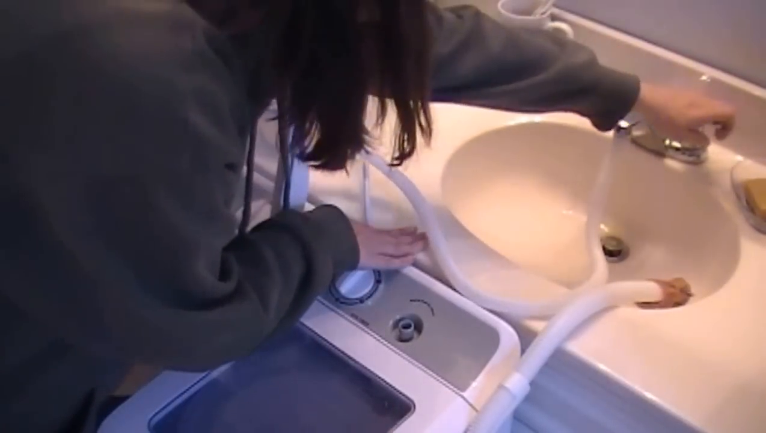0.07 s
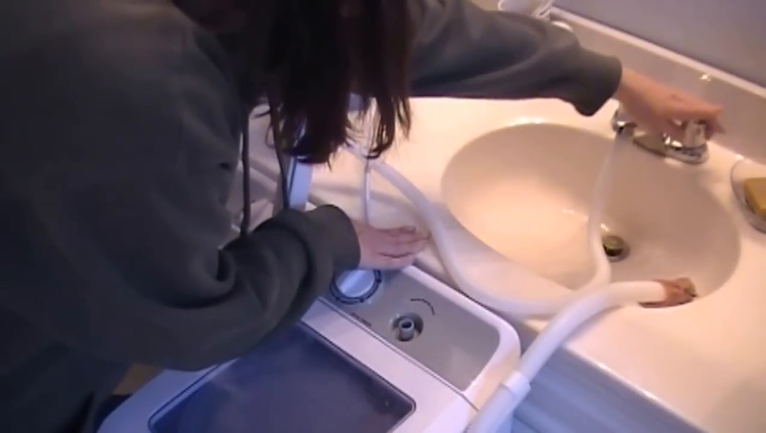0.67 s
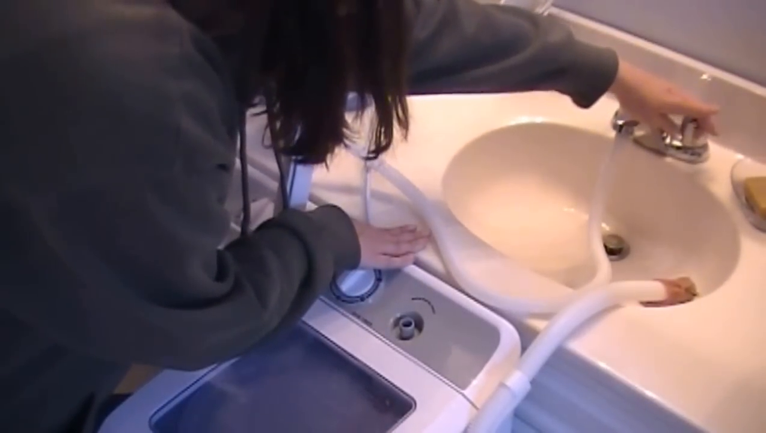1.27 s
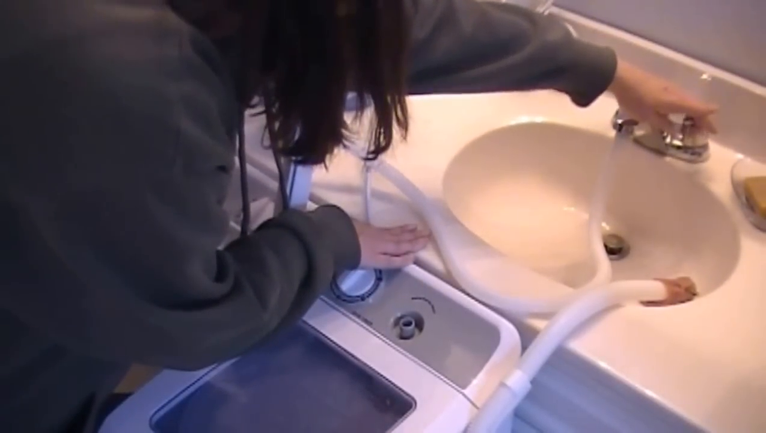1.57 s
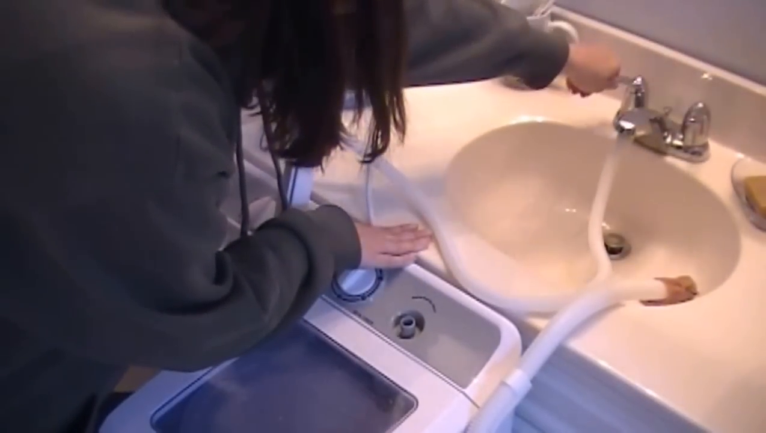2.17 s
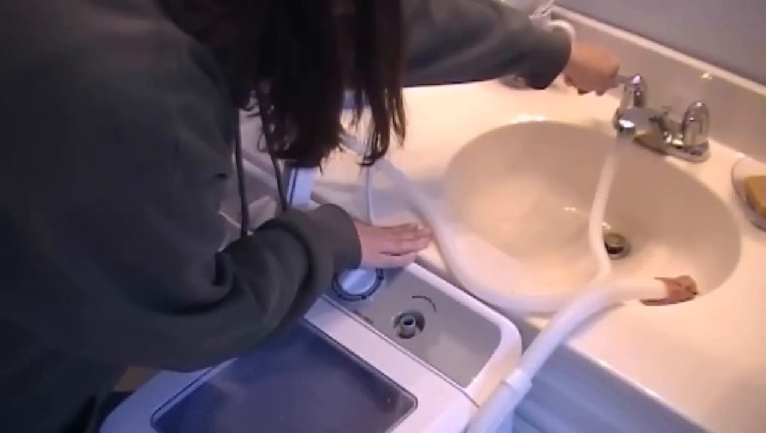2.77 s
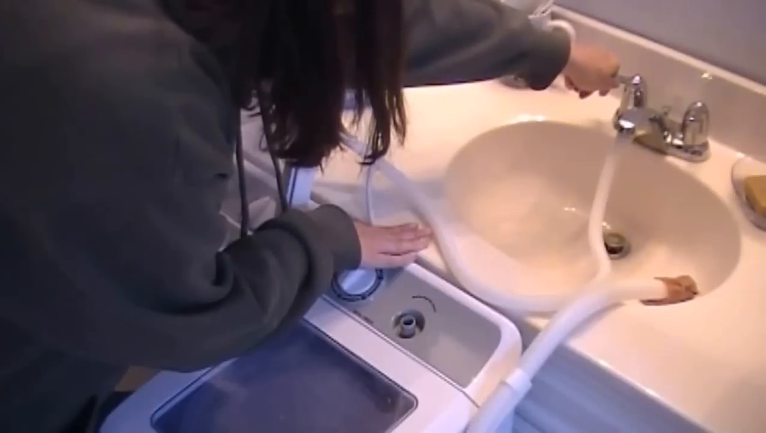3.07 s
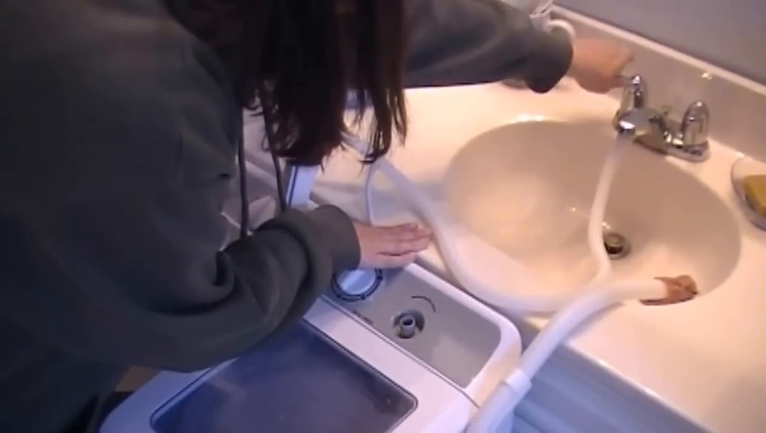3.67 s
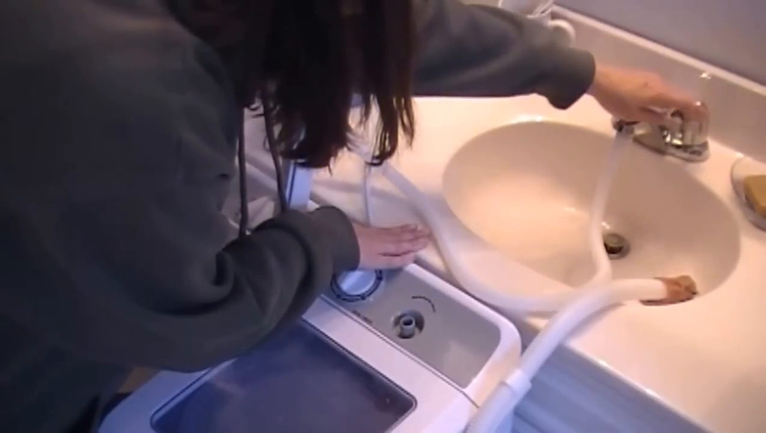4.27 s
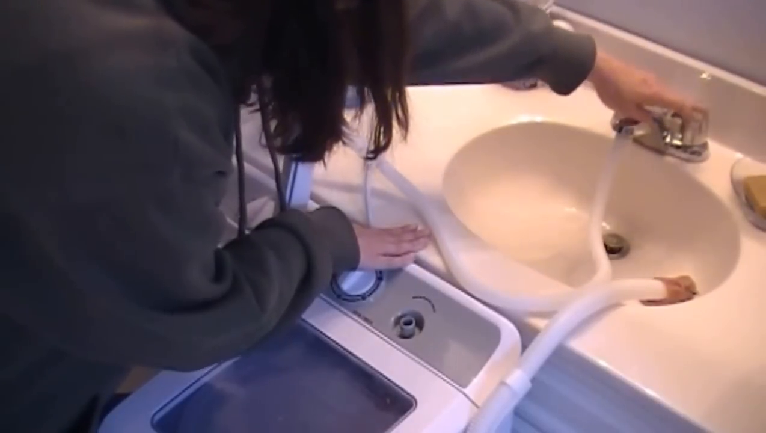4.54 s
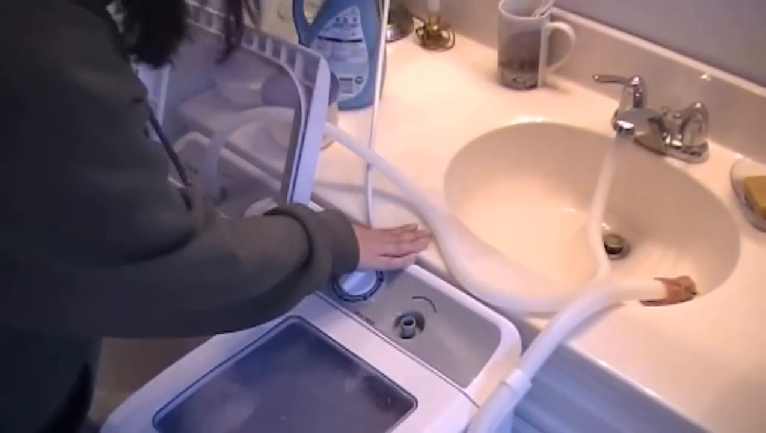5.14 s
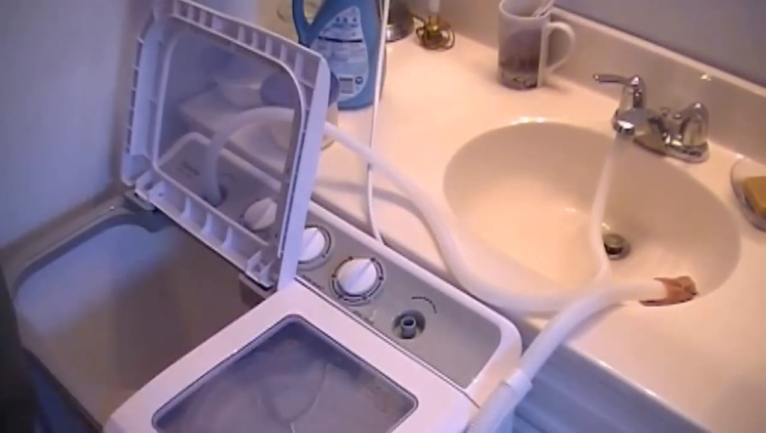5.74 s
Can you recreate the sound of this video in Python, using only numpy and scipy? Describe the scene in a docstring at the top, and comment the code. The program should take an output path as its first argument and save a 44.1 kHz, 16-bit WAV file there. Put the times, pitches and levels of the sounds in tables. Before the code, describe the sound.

In a small bathroom, a rising hiss of running water fills a plastic washer tub while hands occasionally bump it.

```python
"""A short gush of spray hisses and splatters into the hollow tub of a small plastic washing machine.
A bathroom tap feeds it through a hose and is opened further and further: collapsing bubbles excite
resonances of valve and hose, and the jet's impacts ring the tub's air, drum on its floor and shake
the casing. Hands knock the casing and lid a few times, short splashes stand out, tap handles scrape
as they turn, and the reverberation of the small hard room blends it all."""
import sys
import numpy as np
from scipy import signal
from scipy.fft import rfft, irfft, next_fast_len
from scipy.io import wavfile
from scipy.ndimage import map_coordinates

SR = 44100
rng = np.random.default_rng(int(sys.argv[2]) if len(sys.argv) > 2 else 0)


def to_wav(sig):
    """Store sig (one row per channel, or 1-D mono) as 16-bit WAV at the path in sys.argv[1].

    Samples outside -1..1 are clipped; the rate is SR.
    """
    pcm = np.clip(np.atleast_2d(sig), -1, 1) * 32767
    pcm = np.round(pcm).astype(np.int16)
    wavfile.write(sys.argv[1], SR, pcm.T)  # frames by channels


N = 264776

# Spectrum of drops striking the tub. Each row: frequency in Hz, relative level in dB.
SPLATTER_SPECTRUM = [(150, -64), (600, -11), (1000, -11), (1250, 0), (1600, 1), (2250, 3), (2600, -3.5),
                     (3500, -9.5), (12000, -52)]


def amp(db):
    """Decibels express an amplitude ratio logarithmically."""
    return 10 ** (np.asarray(db) / 20)


def unit(x):
    """Normalisation brings the rms to 1."""
    return x / np.sqrt(np.mean(x ** 2) + 1e-20)


def along(points, hz):
    """Interpolation reads (Hz, value) points on a logarithmic frequency axis."""
    freqs, values = np.transpose(points)
    return np.interp(np.log(hz + 1), np.log(freqs + 1), values)


def ramp(start_s, rise_s):
    """A linear transition runs from 0 to 1."""
    return np.clip((np.arange(N) / SR - start_s) / rise_s, 0, 1)


def wobble(rate):
    """Slow random modulation: a spline passes through rate knots a second."""
    return map_coordinates(rng.standard_normal(1024), [np.arange(N) * rate / SR], mode="wrap")


def filtered(x, response):
    """Linear filtering multiplies the spectrum by a frequency response."""
    size = next_fast_len(x.shape[-1] + SR // 4)
    return irfft(rfft(x, size) * response(np.fft.rfftfreq(size, 1 / SR)), size)[..., :x.shape[-1]]


def resonances(modes, hz):
    """Damped oscillators each add a peak to the power response."""
    return sum(amp(db) ** 2 * (hz * width) ** 2 / ((centre ** 2 - hz ** 2) ** 2 + (hz * width) ** 2)
               for centre, width, db in modes)


def colour(spectrum):
    """A spectral envelope in dB sets a broad amplitude response."""
    return lambda hz: amp(along(spectrum, hz))


def body(spectrum, modes, ring_db):
    """A broad spectrum and the modes that stand out of it add in power."""
    return lambda hz: np.sqrt(colour(spectrum)(hz) ** 2 + amp(ring_db) ** 2 * resonances(modes, hz))


def drops(per_second, spread_db, share):
    """Shot noise: impacts timed alike in both channels carry a share of the power, turbulence the rest."""
    falls = rng.random(N) < per_second / SR
    sizes = falls * amp(spread_db * np.clip(rng.standard_normal(N), -2, 2))
    impacts = unit(sizes * rng.standard_normal((2, N)))
    return np.sqrt(share) * impacts + np.sqrt(1 - share) * rng.standard_normal((2, N))


def burst(t60, rise_s):
    """Exponential decay: noise, and an envelope for it that falls 60 dB in t60 seconds."""
    t = np.arange(SR // 2) / SR
    return rng.standard_normal((2, len(t))), amp(-60 * t / t60) * (1 - np.exp(-t / rise_s))


def add(track, start_s, sound):
    """Superposition adds a sound to the track."""
    start = max(round(start_s * SR), 0)
    part = track[:, start:start + sound.shape[1]]
    part += sound[:, :part.shape[1]]


def driven(full_db, growth):
    """A power law: the level in dB gains growth dB for each dB of flow."""
    # The opening of the tap. Each row: time in seconds, flow in dB relative to full.
    flow = [(.1, -22), (.3, -15.5), (.6, -13), (1.42, -8), (1.85, -8), (2.95, -2.5), (4.3, -0.83), (6, 0.6)]
    return full_db + growth * np.interp(np.arange(N) / SR, *np.transpose(flow))


def gush(db, fall_db_per_s, hold_s=0):
    """The gain of the first gush holds for hold_s, then decays exponentially."""
    return amp(db - fall_db_per_s * np.maximum(np.arange(N) / SR - hold_s, 0))


def surges():
    """Pressure transients raise the level in dB: each jumps up, holds and relaxes."""
    # Each row: start in seconds, added level in dB.
    swells = [(.92, 4), (1.22, 3), (1.39, 4), (2.067, 0.5), (2.23, 0), (3.08, 4), (4.31, 0.5), (5.646, 2),
              (5.874, 2)]
    attack_s, hold_s, release_s = 0.0053, 0.04, 0.086
    return sum(db * (ramp(s, attack_s) - ramp(s + hold_s, release_s)) for s, db in swells)


def spray(flutter):
    """Atomisation: fine spray leaves the nozzle as bright noise that swells with the pressure."""
    # Each row: frequency in Hz, relative level in dB.
    spectrum = [(200, -70), (3000, -7.5), (6000, -3.5), (9500, 0.5), (10300, 0.5), (10620, 5.5), (11200, 4),
                (12000, 5), (12900, -7), (14000, -6.5), (15700, -12)]
    mist = filtered(drops(8000, spread_db=2.8, share=0.16), colour(spectrum))
    gain = np.hypot(amp(driven(-25.5, growth=0.69) + surges()), gush(-28.5, 90, hold_s=0.063))
    return unit(room(mist, wet_db=-8)) * gain * amp(0.4 * flutter + 0.096 * wobble(6.5))


def tub_ring(slosh_db):
    """Cavity resonance: drops ring the air in the tub, even under a gentle stream."""
    # Each row: frequency in Hz, bandwidth in Hz, relative level in dB.
    air_modes = [(1400, 370, -9.5), (1470, 39, 3.5), (1605, 79, 1), (1920, 120, -4), (2140, 41, -3.5),
                 (2287, 26, -0.5)]
    cavity = lambda hz: np.sqrt(resonances(air_modes, hz)) * colour(SPLATTER_SPECTRUM)(hz)
    ring = filtered(drops(2000, spread_db=0.38, share=0.29), cavity)
    gain = np.hypot(amp(driven(-35, growth=0.24)), gush(-32.5, fall_db_per_s=58))
    return unit(ring) * gain * amp(slosh_db)


def splatter(slosh_db, aside):
    """Impact noise: the broken jet spatters in the tub, louder once the person no longer shields it."""
    impacts = filtered(drops(1400, spread_db=4.9, share=0.64), colour(SPLATTER_SPECTRUM))
    gain = np.hypot(amp(driven(-33.5, growth=1.03) + 4 * aside), gush(-34, fall_db_per_s=21))
    spurts_db = 0.45 * wobble(30)
    return unit(room(impacts, wet_db=4.5)) * gain * amp(slosh_db + spurts_db)


def valve_hiss(flutter):
    """Cavitation: tiny collapsing bubbles ring the high modes of the valve."""
    # Each row: frequency in Hz, relative level in dB.
    spectrum = [(300, -90), (4000, -52), (5200, -27), (6300, -22), (6750, -13), (7100, 22.5), (7400, 2),
                (8200, -26), (8700, 15), (9200, -15), (9800, -8), (10600, -16), (13000, -40)]
    # Each row: frequency in Hz, bandwidth in Hz, relative level in dB.
    valve_modes = [(6010, 18, -4.5), (6596, 17, -0.5), (7040, 137, -1), (7364, 69, 1), (7610, 150, -6.5),
                   (7920, 50, -0.5), (8100, 50, -4.5), (8670, 280, 0.5), (8700, 310, -6.5), (9150, 136, 3),
                   (9600, 390, -5), (10480, 33, -2.5), (12120, 57, -4)]
    hiss = filtered(drops(14000, spread_db=4.3, share=0.48), body(spectrum, valve_modes, ring_db=22))
    level_db = driven(-18.5, growth=0.89) + 0.086 * flutter + 0.33 * wobble(27)
    return unit(room(hiss, wet_db=-6)) * amp(level_db)


def hose_song(flutter):
    """Resonance: bubble noise excites the narrow modes of the hose, which sing above the rush."""
    # Each row: frequency in Hz, relative level in dB.
    spectrum = [(100, -70), (1500, -29), (2400, -2.5), (2800, -0.5), (3400, 2), (4450, 0), (4750, -5),
                (5500, -11.5), (7000, -11), (15000, -50)]
    # Each row: frequency in Hz, bandwidth in Hz, relative level in dB.
    hose_modes = [(3037, 23, 5.5), (3296, 38, 3.5), (3590, 25, 4.5), (3665, 23, 3.5), (4033, 34, 5.5),
                  (4405, 85, -4)]
    song = filtered(drops(4000, spread_db=7, share=0.38), body(spectrum, hose_modes, ring_db=6.5))
    level_db = driven(-26.7, growth=0.87) + 0.45 * surges() + 0.8 * flutter + 0.16 * wobble(7.7)
    return unit(room(song, wet_db=-4.5)) * amp(level_db)


def floor_drum(slosh_db, early):
    """Forced vibration: the jet drums on the tub's floor, a little weaker until it lands there."""
    # Each row: frequency in Hz, relative level in dB.
    spectrum = [(25, -52), (60, -32), (105, -21), (150, -17), (205, -7), (310, -4.5), (390, 1), (450, -2.5),
                (570, 3), (690, -1), (800, 0), (1000, 1.5), (1500, 1.5), (6000, -43)]
    drum = filtered(drops(900, spread_db=1.3, share=0.39), colour(spectrum))
    return unit(room(drum, wet_db=5.5)) * amp(driven(-38.5, growth=0.34) - 2 * early + slosh_db)


def casing(edge_hz):
    """Modal response of the plastic shell: a soft contact mainly excites modes below edge_hz."""
    # Each row: frequency in Hz, bandwidth in Hz, relative level in dB.
    shell_modes = [(146, 31, -4.5), (213.6, 10.4, 3.5), (255, 14, 0.5), (347, 30, 2.5), (560, 130, 6),
                   (970, 520, 0), (1470, 490, 4), (2350, 690, -1)]
    low_hz = 115  # slower flexing hardly radiates
    rolloff = lambda hz: (1 + (hz / edge_hz) ** 6) * (1 + (low_hz / (hz + 1)) ** 4)
    return lambda hz: np.sqrt(resonances(shell_modes, hz) / rolloff(hz))


def casing_boom(slosh_db, early, aside):
    """Structure-borne sound: the landed jet shakes the casing, less once nobody leans on it."""
    boom = filtered(drops(300, spread_db=3.2, share=0.47), casing(edge_hz=395))
    return unit(boom) * amp(driven(-53, growth=0.092) - 20 * early - 5 * aside + slosh_db)


def knocks():
    """Impulse excitation: each blow on casing or lid is a sharp push and a dying rattle."""
    # Each row: start in seconds, relative level in dB, bright edge in Hz, 60 dB decay time in seconds.
    blows = [(.882, -57, 1500, 0.16), (.935, -40, 1800, 0.34), (.966, -38.5, 1800, 0.34),
             (1.294, -39.5, 1800, 0.27), (1.323, -43, 900, 0.44), (1.485, -42, 2000, 0.098),
             (2.584, -37, 1920, 0.26), (3.189, -39, 1000, 0.26), (4.07, -38.5, 700, 0.18),
             (4.186, -43, 700, 0.29), (5.163, -23.5, 3200, 0.096), (5.17, -29.5, 2600, 0.17),
             (5.185, -34.5, 1100, 0.22)]
    out = np.zeros((2, N))
    lead = SR // 20  # samples for the response to spread ahead of the blow
    for start_s, db, edge_hz, t60 in blows:
        noise, fade = burst(t60, rise_s=0.0005)
        shell = casing(edge_hz)
        push = 6 * signal.unit_impulse(len(fade))
        force = np.pad(fade * noise + push, ((0, 0), (lead, 0)))
        gain = amp(db + 6) / np.std(filtered(noise, shell))
        add(out, start_s - lead / SR, gain * filtered(force, shell))
    return out


def splashes_and_scrapes():
    """Transients: short splashes and the scrape of turning tap handles, each a decaying band of noise."""
    # Each row: start in seconds, relative level in dB, centre in Hz, width in octaves.
    transients = [(1.085, -33.5, 4650, 0.63), (1.396, -33.5, 2320, 0.19), (1.484, -29.5, 2050, 0.7),
                  (1.715, -35, 1590, 0.34), (2.066, -33, 3870, 0.36), (2.92, -39, 2280, 0.16),
                  (3.001, -25, 7700, 0.36), (3.041, -26, 2080, 0.66), (3.07, -26, 6840, 0.55),
                  (3.117, -34, 1600, 0.24), (4.383, -30.5, 1840, 0.26), (4.876, -32.5, 1620, 0.17),
                  (5.372, -29, 2200, 0.78), (5.96, -29.5, 1610, 0.64)]
    out = np.zeros((2, N))
    for start_s, db, centre_hz, octaves in transients:
        noise, fade = burst(t60=0.26, rise_s=0.00082)
        band = lambda hz: np.exp(-0.5 * (np.log2((hz + 1) / centre_hz) / octaves) ** 2)
        add(out, start_s, amp(db + 6) * fade * unit(filtered(noise, band)))
    return out


def room(x, wet_db):
    """Reverberation: hard walls give each channel its own tail, at about the same total power."""
    # Each row: frequency in Hz, 60 dB decay time in seconds.
    decay_times = [(200, 0.27), (2000, 0.17), (8000, 0.19), (15000, 0.1)]
    hz, t, spectra = signal.stft(rng.standard_normal((2, SR // 3)), SR, nperseg=256)
    tail = signal.istft(spectra * amp(-60 * t / along(decay_times, hz)[:, None]), SR, nperseg=256)[1]
    echo = signal.fftconvolve(x, tail / np.linalg.norm(tail[0]), axes=1)[:, :N]
    return (x + amp(wet_db) * echo) / np.sqrt(1 + amp(wet_db) ** 2)


def microphones(x):
    """Partial coherence: two ports share some sound, and the tub on the left is louder on that side."""
    # Each row: frequency in Hz, correlation given to independent channels.
    likeness = [(100, .5), (500, 0.27), (1500, 0.38), (3500, 0.46), (8000, 0.56), (11000, 0.32),
                (15000, 0.52)]
    # Each row: frequency in Hz, left minus right level in dB.
    balance = [(60, 20), (130, 8), (380, 8), (700, 5.5), (1290, 4), (2380, 3), (4400, 1.5), (8120, 0.1),
               (15000, 3)]
    # Each row: frequency in Hz, phase lag of the left channel in radians.
    lag = [(100, 0.15), (500, 0.17), (1500, 0.74), (3800, 1.43), (5700, 1.9), (7200, 1.07), (9000, 1.08),
           (13500, 1.84)]
    angle = lambda hz: np.arcsin(along(likeness, hz)) / 2
    pair = filtered(x, lambda hz: np.cos(angle(hz))) + filtered(x[::-1], lambda hz: np.sin(angle(hz)))
    side = np.array([[0.5], [-0.5]])
    return filtered(pair, lambda hz: amp(side * along(balance, hz)) * np.exp(-1j * side * along(lag, hz)))


def scene():
    """Running water and handling superpose at the microphones."""
    flutter = wobble(28)  # the water pressure trembles
    slosh_db = 0.8 * wobble(11)
    early = 1 - ramp(0.99, rise_s=0.06)  # 1 until the jet finds the tub's floor
    aside = ramp(4.93, rise_s=0.84)  # the person steps away from the machine
    tap = spray(flutter) + valve_hiss(flutter) + hose_song(flutter)
    tub = tub_ring(slosh_db) + splatter(slosh_db, aside)
    rumble = floor_drum(slosh_db, early) + casing_boom(slosh_db, early, aside)
    return microphones(tap + tub + rumble + room(knocks() + splashes_and_scrapes(), wet_db=-19))


def record(dry):
    """Band limiting sheds the deep bass and removes the highest treble."""
    low_cut_hz, top_hz = 60, 15780
    thin = signal.sosfilt(signal.butter(2, low_cut_hz, "highpass", fs=SR, output="sos"), dry)
    return filtered(thin, lambda hz: hz < top_hz)


dry = scene()
out = record(dry)
to_wav(out)
```